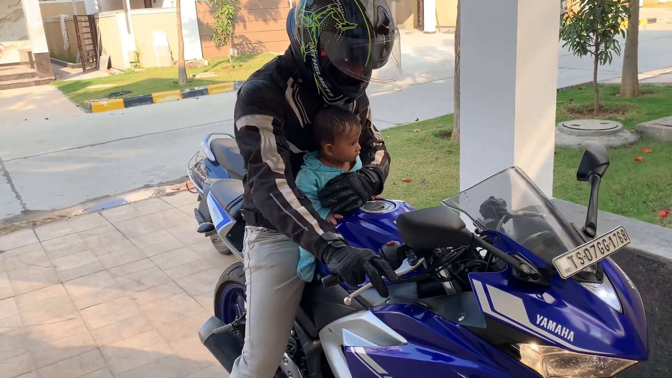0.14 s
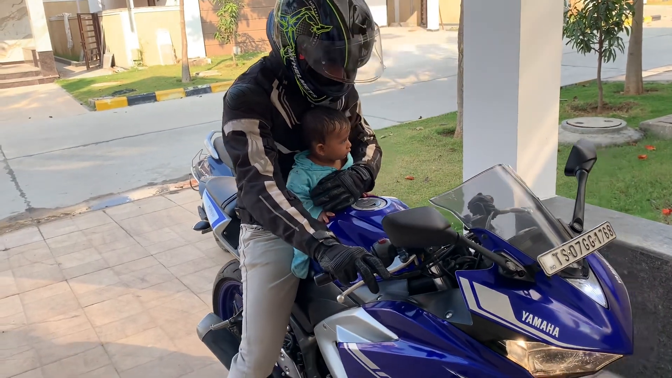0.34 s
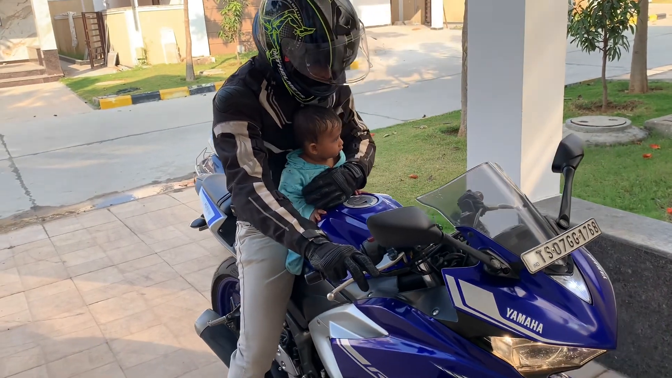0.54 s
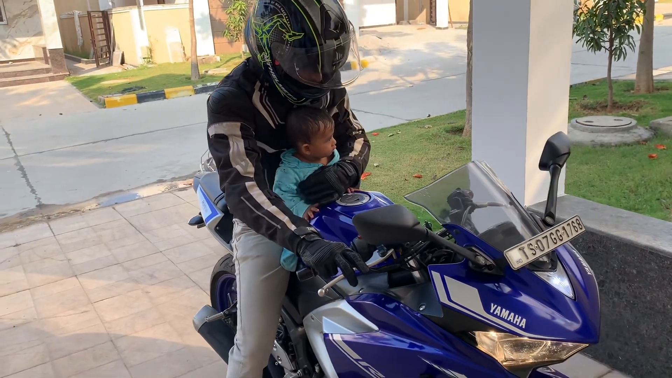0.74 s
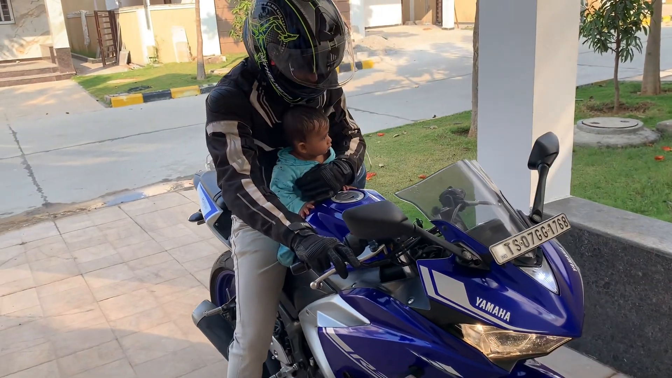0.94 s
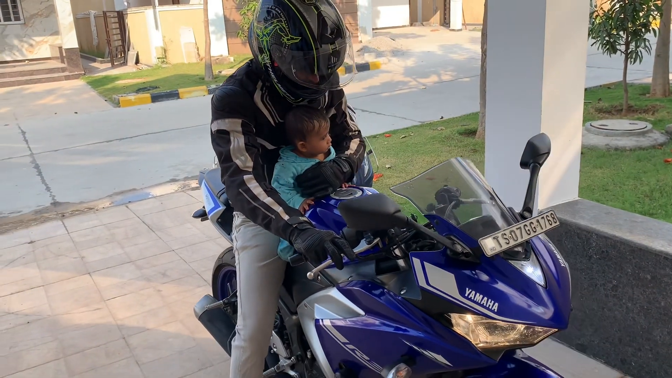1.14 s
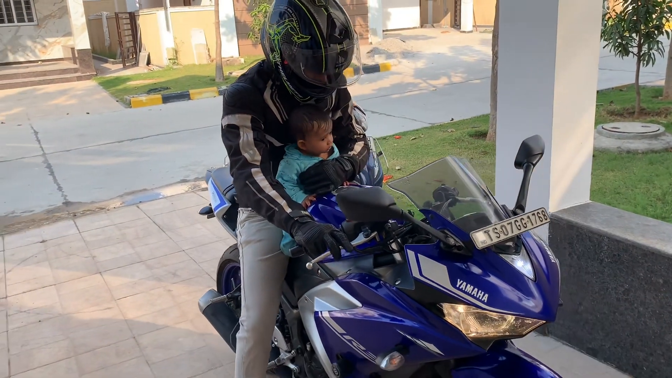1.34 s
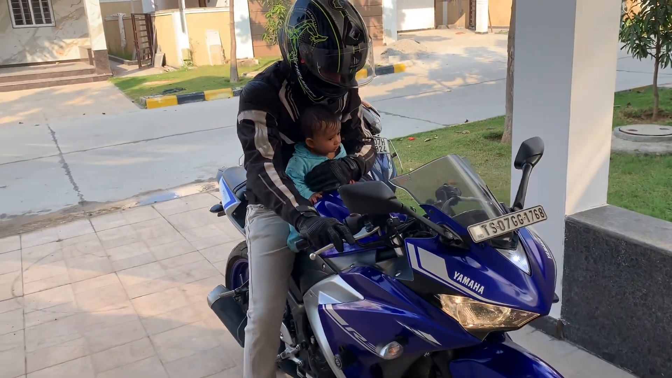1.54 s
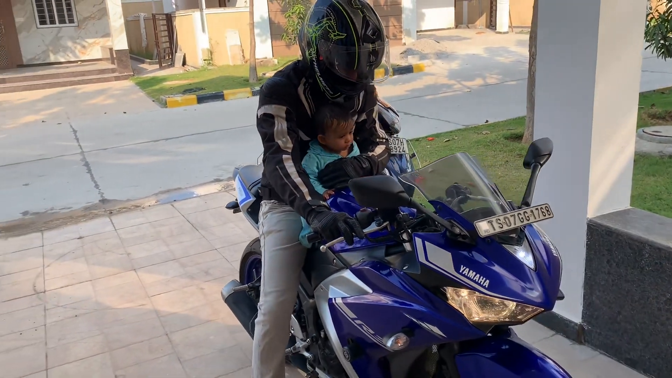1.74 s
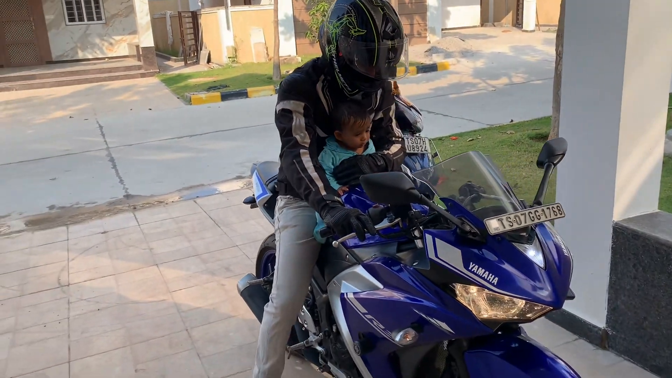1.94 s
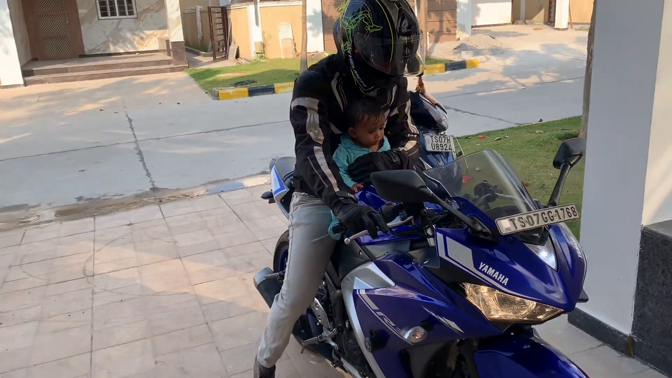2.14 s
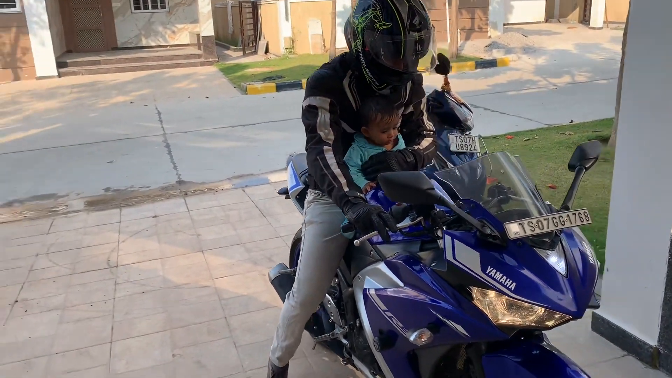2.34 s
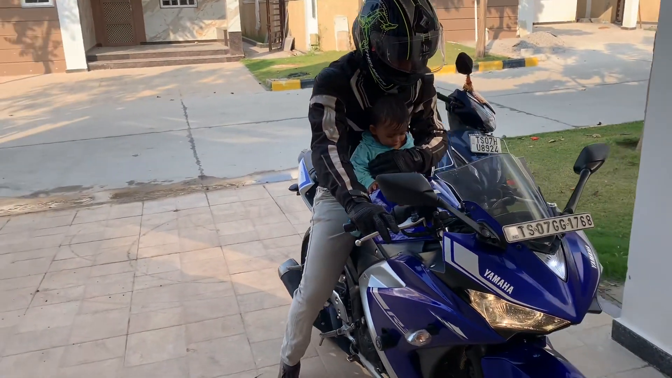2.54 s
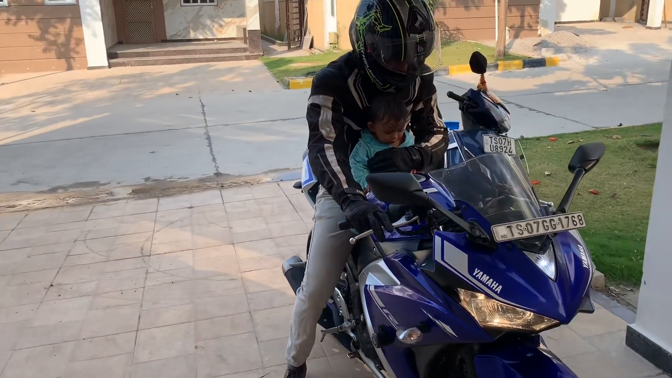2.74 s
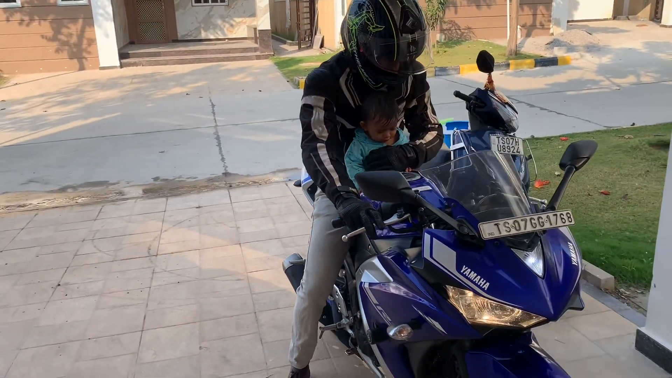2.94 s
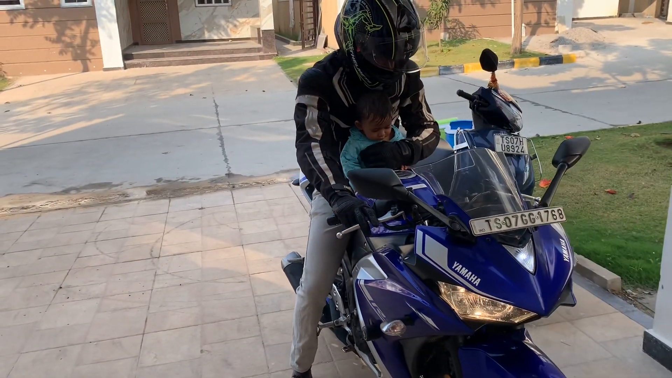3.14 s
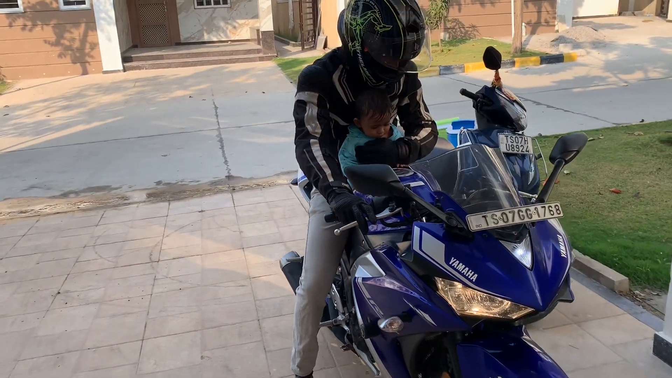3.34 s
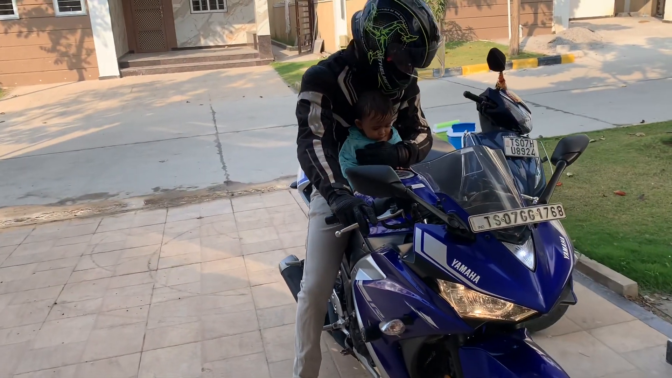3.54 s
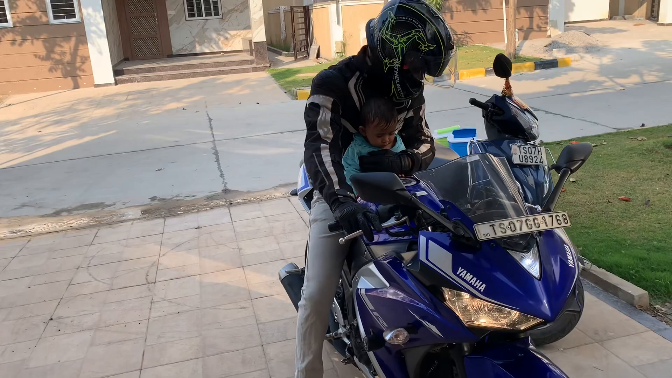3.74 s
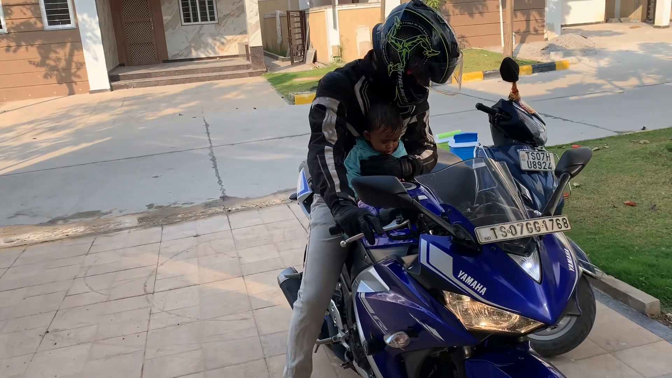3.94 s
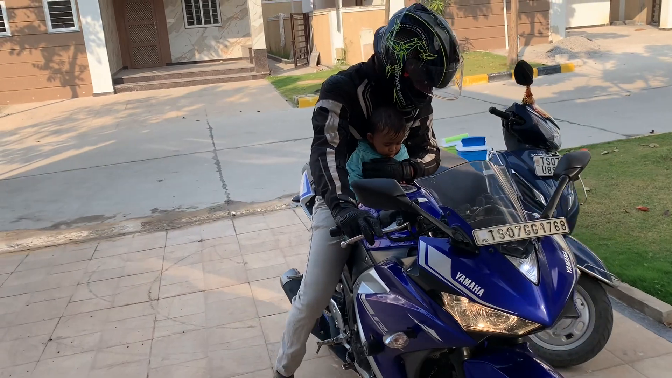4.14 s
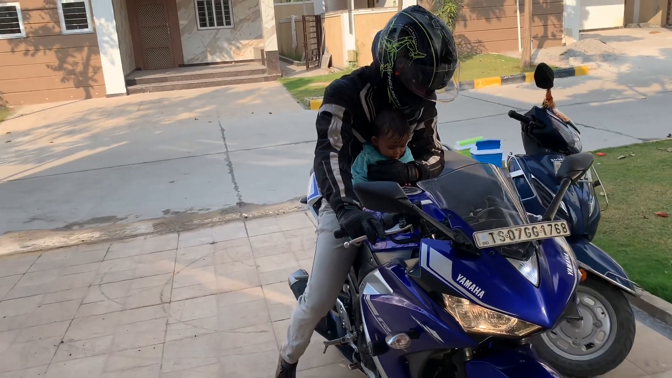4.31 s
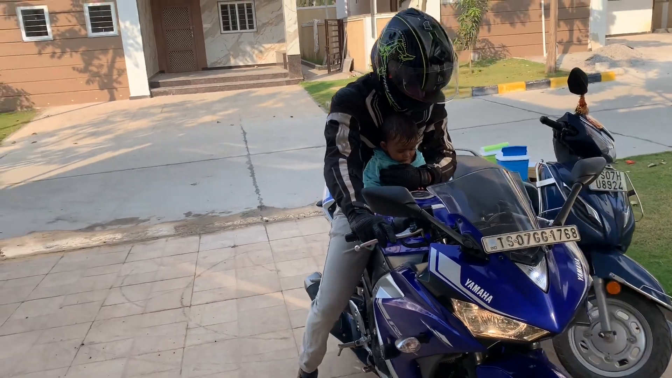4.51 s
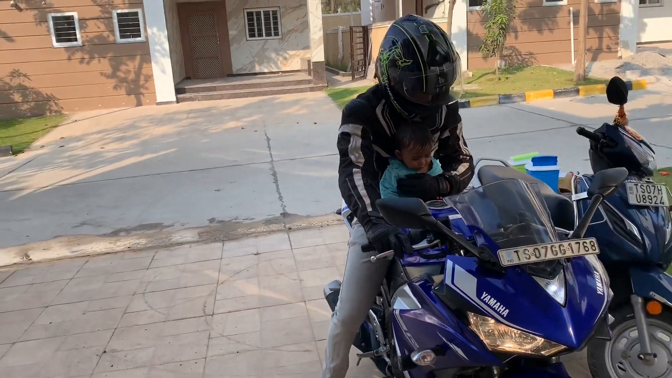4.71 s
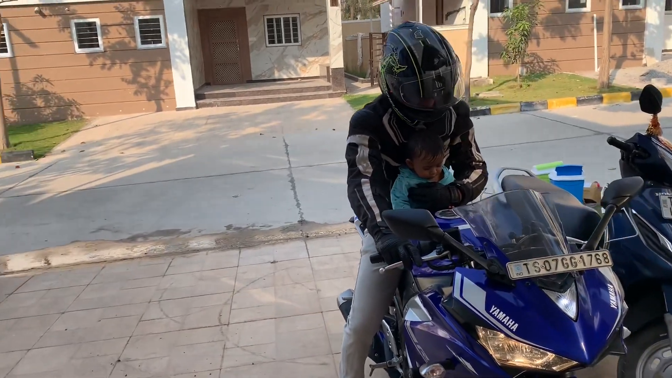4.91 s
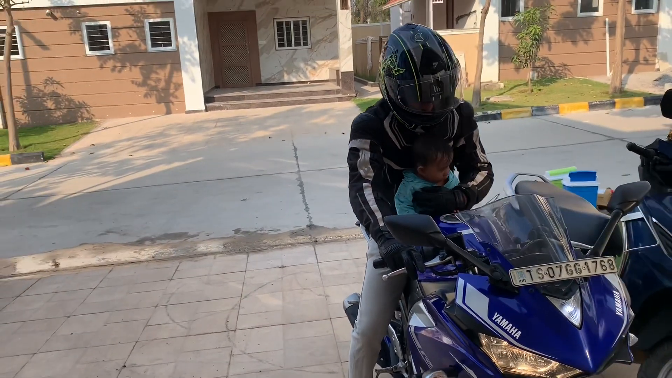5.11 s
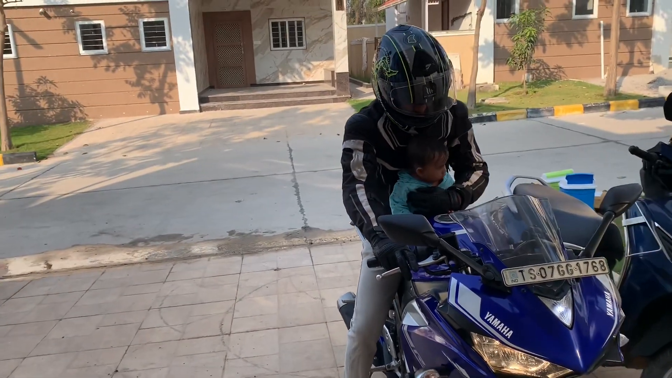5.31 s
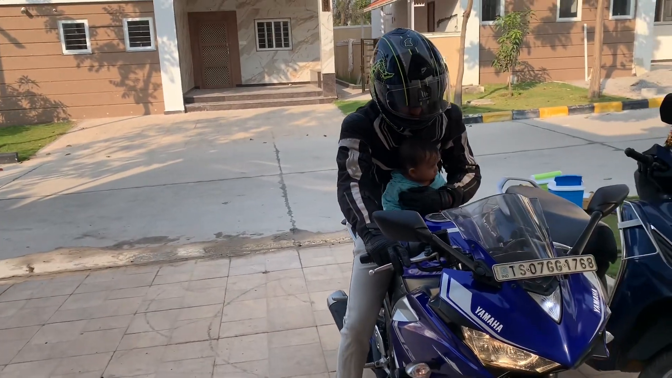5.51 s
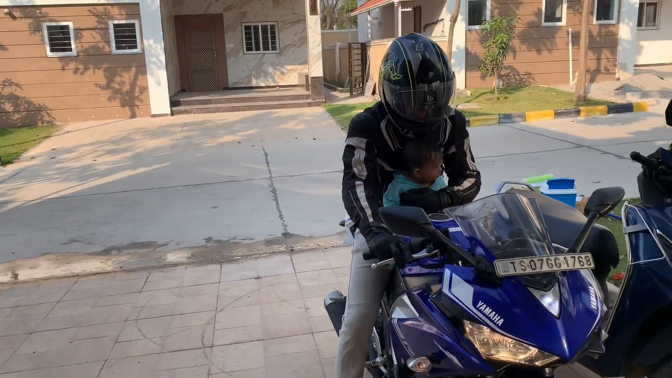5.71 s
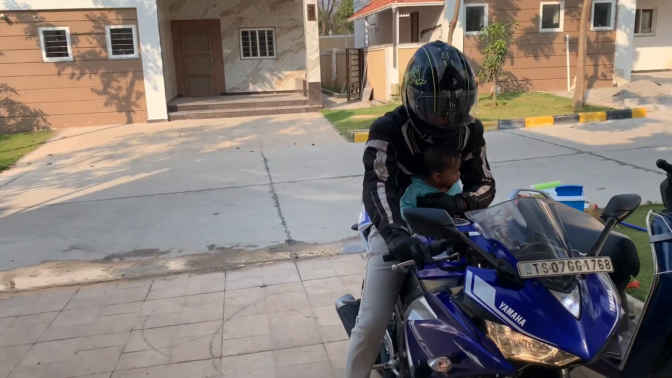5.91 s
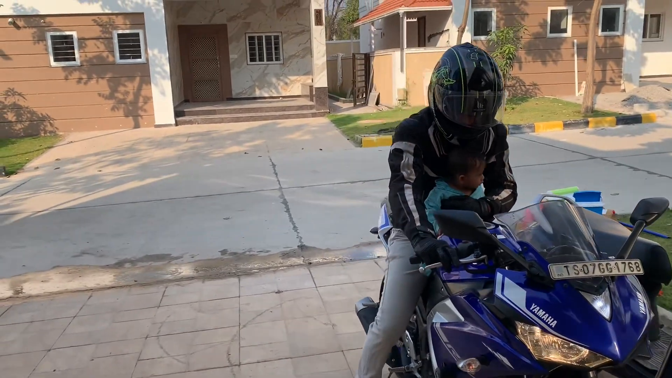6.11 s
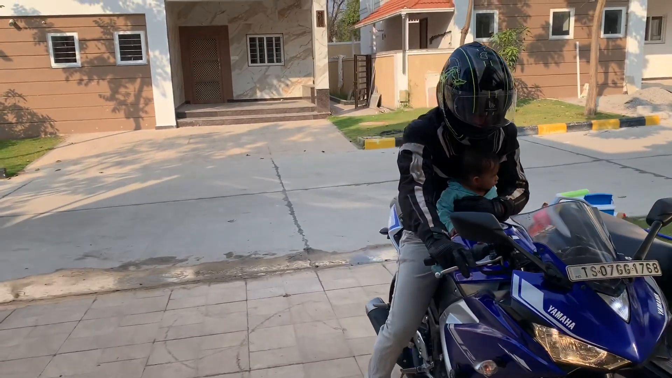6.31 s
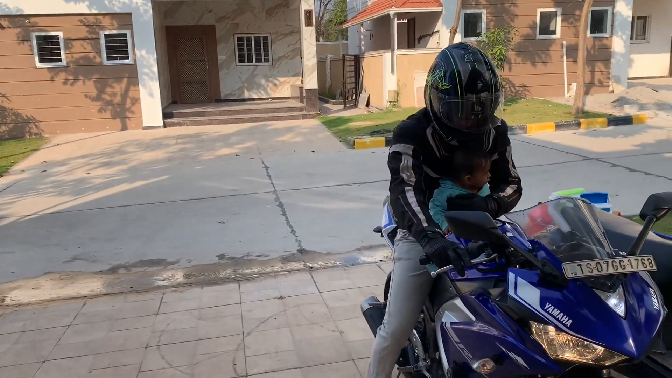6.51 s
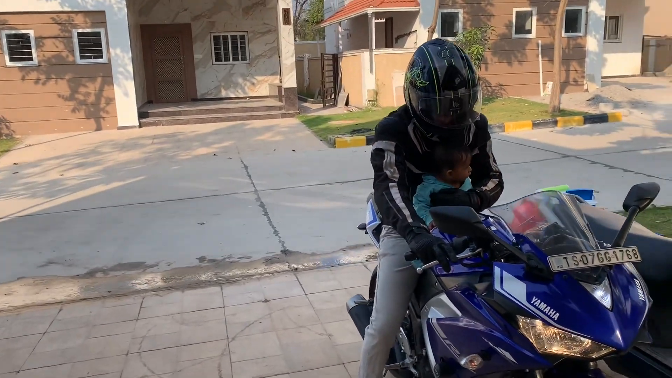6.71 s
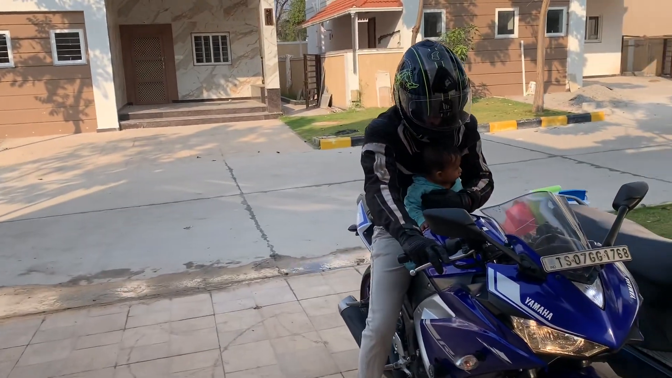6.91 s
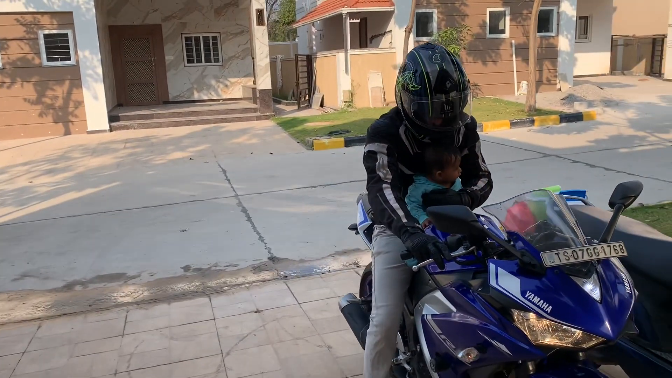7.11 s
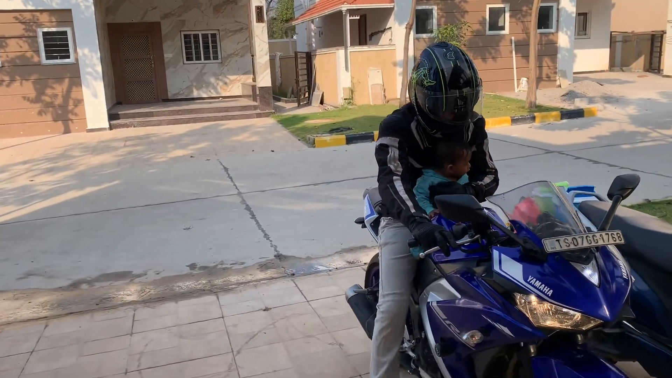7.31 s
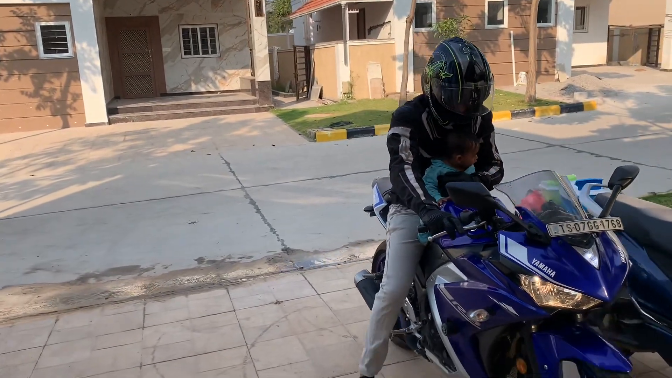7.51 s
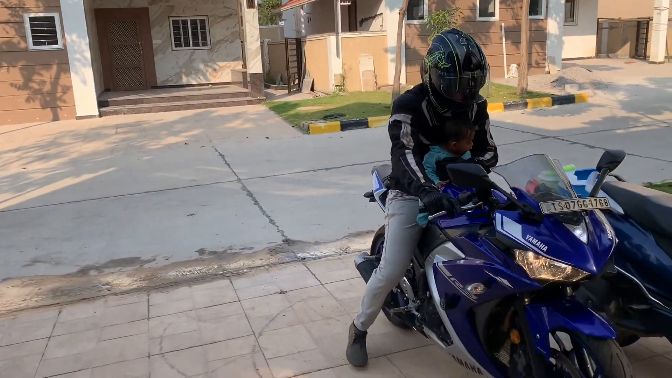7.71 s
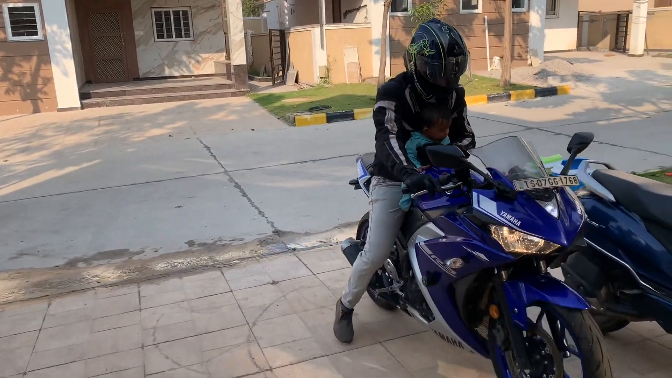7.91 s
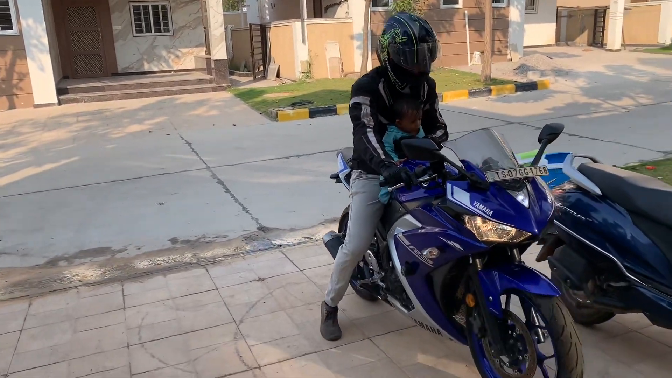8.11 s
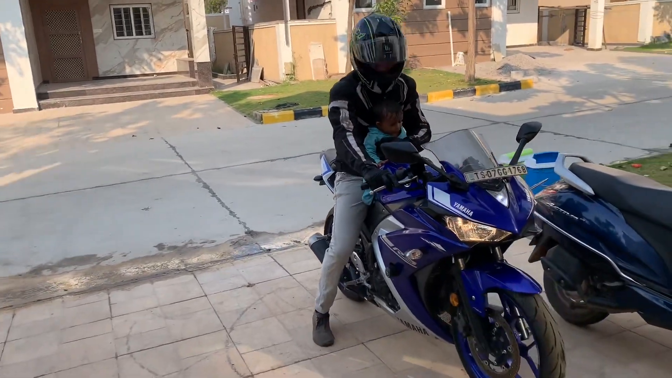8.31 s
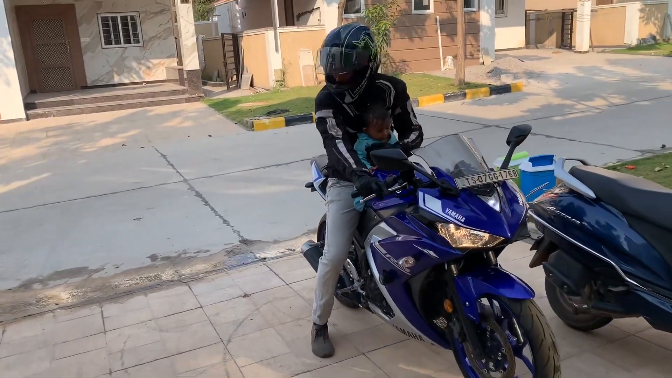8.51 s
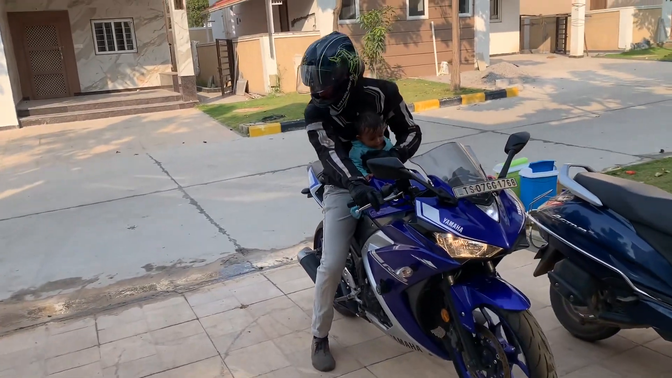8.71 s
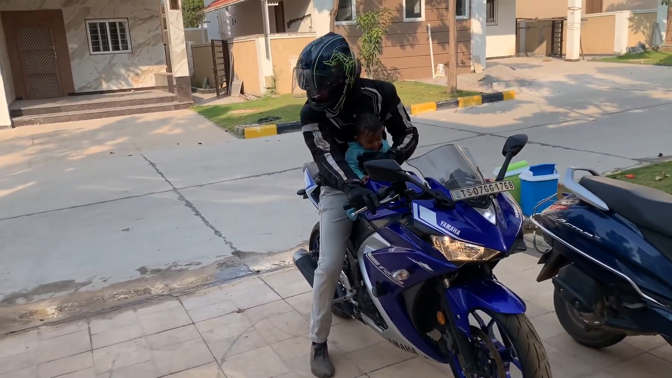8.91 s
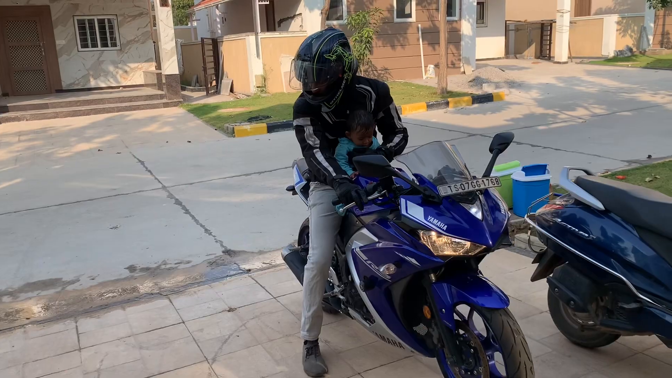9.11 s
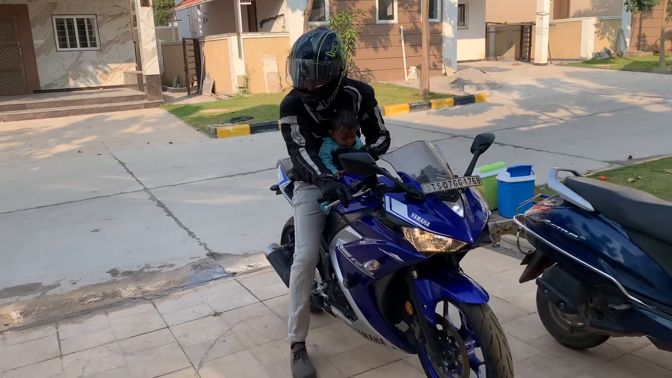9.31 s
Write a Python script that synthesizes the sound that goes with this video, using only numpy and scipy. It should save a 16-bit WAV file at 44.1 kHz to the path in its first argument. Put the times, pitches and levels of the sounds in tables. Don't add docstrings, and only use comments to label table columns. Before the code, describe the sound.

From 0 s a twin-cylinder motorcycle is already idling, with no starting sound. Rapid paired firings, about fourteen pairs a second, make a deep, slightly lumpy throb around 50 to 100 Hz, with rough pipe overtones above. Close to the nose one also hears a nasal intake honk, valve ticking, chain and gear whir, and crisp rhythmic puffs of hiss. The honk stands out near 1.4 s. Between 2.35 and 2.8 s six quick metallic tappet rattles ring out, strongest near 2.65 s. The idle climbs gently until about 5.8 s, wavering with small sags. From roughly 3.5 s the phone moves away; machinery softens, while boom and resonance swell near 5.6, 6.2 and 8.2 s. The idle eases around 6.6 s, then recovers, continuing unbroken to 9.35 s. Short porch echoes and shifting stereo treble surround it.

```python
import sys
import numpy as np
from scipy import signal
from scipy.fft import rfft, irfft
from scipy.io import wavfile
from scipy.ndimage import uniform_filter1d

SR = 44100
rng = np.random.default_rng(int(sys.argv[2]) if len(sys.argv) > 2 else 0)


def pcm_store(signal):
    levels = np.round(np.clip(np.atleast_2d(signal), -1, 1) * 32767)
    wavfile.write(sys.argv[1], SR, levels.astype(np.int16).T)


def convert_level_to_amplitude(level_db):
    exponent = np.asarray(level_db, float) / 20
    return 10 ** exponent


N = 412335
RUN_UP = 22050


def level(x, db):
    return x * convert_level_to_amplitude(db) / np.sqrt(np.mean(x ** 2))


def curves(table):
    s, *columns = np.transpose(table)
    return [np.interp(np.arange(N) / SR, s, c) for c in columns]


def noise(colour):
    hz, db = np.transpose(colour)
    axis = np.maximum(np.fft.rfftfreq(N, 1 / SR), 1)
    gain = convert_level_to_amplitude(np.interp(np.log(axis), np.log(hz), db, left=-90))
    return level(irfft(rfft(rng.standard_normal(N)) * gain, N), 0)


def wander(rate_hz):
    hold = int(SR / rate_hz)
    steps = np.repeat(rng.standard_normal(N // 500), hold)[:N]
    return 1.3 * uniform_filter1d(uniform_filter1d(steps, hold), hold)


def ring(x, hz, width_hz):
    return signal.lfilter(*signal.iirpeak(hz, hz / width_hz, fs=SR), x)


def body(x, modes):
    return sum((-1) ** k * convert_level_to_amplitude(db) * ring(x, hz, width) for k, (hz, width, db) in enumerate(modes))


def groups(x, banks, levels_db, flicker_db):
    out = 0
    for bank, db in zip(banks, levels_db):
        out = out + level(body(x, bank)[-N:], 0) * convert_level_to_amplitude(db + flicker_db * wander(5.6))
    return out


def strokes(cycle, places, scatter_db, jitter):
    out = np.zeros(len(cycle) + 1)
    turns = np.arange(-6, cycle[-1])
    for place, db in places:
        chance = rng.standard_normal((200, 2))[:len(turns)]
        at = np.interp(turns + place + jitter * chance[:, 0], cycle, np.arange(len(cycle)))
        size = convert_level_to_amplitude(db + scatter_db * chance[:, 1]) * (at < len(cycle) - 1)
        whole = at.astype(int)
        np.add.at(out, whole, size * (1 - at + whole))
        np.add.at(out, whole + 1, size * (at - whole))
    return out[:-1]


def swell(clicks, rise_s, fall_s):
    for time in (rise_s, fall_s):
        clicks = signal.lfilter([1], [1, -np.exp(-1 / (time * SR))], clicks)
    return clicks / np.mean(clicks)


# time_s, distance_0_to_1, silencer_boom_db
WALK_PATH = [(0, 0.12, -12.5), (.6, 0.08, -14.5), (.95, 0, -11.5), (1.8, 0.08, -14), (2.2, 0.03, -11.5),
             (3.3, 0.06, -13.5), (3.65, 0.2, -13.5), (3.95, 0.16, -12), (4.3, 0.23, -13.5),
             (4.85, 0.33, -14), (5.5, 0.41, -16), (6.07, .58, -16), (6.16, 0.47, -18), (6.65, 0.55, -19.5),
             (6.95, 0.53, -17), (8.1, 0.83, -17.5), (8.5, 1, -19.5), (9.35, 0.94, -18.5)]


def heard(rows):
    away, along = curves(WALK_PATH)[0], np.arange(N) / N
    return np.array([near_db + far_db * away + swing_db * np.cos(2 * np.pi * (turns * along - crest))
                     for near_db, far_db, swing_db, turns, crest in rows])


# start_s, length_s, second_porch_mode_db, pipe_ring_db, intake_honk_db
PILLAR_NOOKS = [
    (1.383, .45, 1, -0.5, 4),
    (3.78, .45, -4, 1, 1),
    (4.15, 0.29, 2, 1.5, -0.5),
    (5.55, 0.52, 5.5, -3, -1),
    (6.12, .55, -0.5, 4, 3),
    (8.2, 0.73, 3, 1.5, .1),
]


def nooks():
    t = np.arange(N) / SR
    inside = [np.clip(np.minimum(t - s, s + length - t) / 0.04, 0, 1) for s, length, *_ in PILLAR_NOOKS]
    return np.array(PILLAR_NOOKS)[:, 2:].T @ np.array(inside)


def porch(x, t60_s, wet_db, count):
    place = np.linspace(0, count - 1, N)
    time, out = np.arange(4096) / SR, np.zeros(N)
    for k in range(count):
        decay = 1000 ** (-time / t60_s)
        echoes = level(rng.standard_normal(len(time)) * decay, wet_db) / np.sqrt(len(time))
        echoes[0] = 1
        span = slice(*np.searchsorted(place, [k - 1, k + 1], "right"))
        fade = np.cos(np.pi / 2 * (place[span] - k))
        out[span] += signal.fftconvolve(x[span], echoes)[:len(x[span])] * fade
    return out / np.sqrt(1 + convert_level_to_amplitude(2 * wet_db))


# time_s, loss_cycles_per_s
LEAN_BURNS = [(0.206, 0.526), (0.579, 0.333), (1.037, 0.378), (1.554, 0.564), (1.719, 0.677), (1.879, 0.23),
              (2.044, 0.316), (2.323, 0.403), (2.652, 0.819), (3.051, 0.908), (3.366, 0.447),
              (3.621, 0.223), (3.89, 0.668), (4.054, 0.504), (4.43, 0.444), (4.759, 0.431), (4.978, 0.856),
              (5.316, 0.482), (5.493, 0.385), (5.822, 0.191), (6.2, 0.57), (6.996, 0.396), (7.389, 0.285),
              (7.791, 0.629), (8.285, 0.47), (8.577, 0.584), (8.845, 0.555), (9.092, 0.438)]


def sag():
    t = np.arange(0, N, 64) / SR
    dips = sum(loss * np.exp(-.5 * ((t - s) / 0.093) ** 2) for s, loss in LEAN_BURNS)
    return np.interp(np.arange(N) / SR, t, dips)


# time_s, four_stroke_cycles_per_s
IDLE_SPEED = [
    (0.0, 12.957),
    (1.3, 13.322),
    (2.4, 13.713),
    (3.6, 14.073),
    (4.6, 14.142),
    (5.8, 14.226),
    (6.6, 13.671),
    (8.1, 13.871),
    (9.35, 14.086),
]


def crank():
    speed = curves(IDLE_SPEED)[0] - sag()
    running = np.r_[np.full(RUN_UP, speed[0]), speed]
    return np.cumsum(running) / SR - RUN_UP * speed[0] / SR


# near_db, far_change_db, swing_db, swings_along_walk, first_crest_swings
MACHINE_LEVELS = [
    (-40.5, -5, .6, 2.8, 0.38),
    (-37.5, -4.5, 0.63, 1.03, 0.74),
    (-35.5, -8, .6, 2.5, 0.29),
]
# pitch_hz, level_db_per_hz
WHIR_COLOUR = [(18, -11), (42, 1), (130, 7.5), (300, -3.5), (600, -3), (820, -10), (1200, -5), (1600, -9.5),
               (2500, -11.5), (3500, -16), (5200, -19), (6500, -18.5), (9000, -20), (16000, -35)]


def chain_whir():
    drift = convert_level_to_amplitude(.6 * wander(4))
    draws = np.array([level(noise(WHIR_COLOUR), 7.49) for _ in range(2)])
    return draws * convert_level_to_amplitude(heard(MACHINE_LEVELS)[1]) * drift


# pitch_hz, width_hz, level_db
CASE_MODES = [
    [(971, 83, 0.5), (1120, 24, 7.5), (1253, 51, 0), (1381, 27, -5)],
    [(1827, 130, 4), (2252, 170, 3.5), (2617, 114, 4.5), (3290, 630, -4.5), (4350, 230, -7)],
]


def valve_gear(cycle):
    places = [(.55, 0.1), (.66, -1.5), (.9, -4), (.15, -7)]
    valves = swell(strokes(cycle, places, scatter_db=1.8, jitter=.02), .003, .012)
    case_db = heard(MACHINE_LEVELS)[:2]
    draws = [groups(rng.standard_normal(len(cycle)) * (0.36 + valves), CASE_MODES, case_db, 0.39)
             for _ in range(2)]
    return np.array(draws) * convert_level_to_amplitude(-2.5)


# pitch_hz, level_db_per_hz
PUFF_COLOUR = [(2000, -26), (4000, -26), (5200, 1.5), (6500, -0.5), (8500, -1), (11000, 1), (13000, -3),
               (14300, 1.5), (15300, -3.5), (16000, 4)]


def gas_puffs(cycle):
    puff_places = [(.56, 0.1), (.81, .6), (.0, -9), (.23, -10)]
    puffs = swell(strokes(cycle, puff_places, scatter_db=1.6, jitter=.012), .0025, .014)[-N:]
    tick_places = [(.6, 0.1), (.66, -3), (.86, 0.2), (.92, -2), (.28, -7)]
    ticks = swell(strokes(cycle, tick_places, scatter_db=3.2, jitter=.015), .0004, .004)[-N:]
    gain = convert_level_to_amplitude(heard(MACHINE_LEVELS)[2])
    draws = []
    for _ in range(2):
        soft = level(noise(PUFF_COLOUR) * (0.16 + puffs), 0.41)
        sharp = level(noise([(7000, -20), (11000, -3), (16000, -5.0)]) * ticks, -14)
        draws.append(porch((soft + sharp) * gain, t60_s=0.039, wet_db=8, count=30))
    return np.array(draws)


# pitch_hz, width_hz, level_db
INTAKE_MODES = [
    [(367.9, 9.6, 2.5), (426, 110, -20.5)],
    [(486, 13.3, -6), (536.3, 25, -2)],
    [(638, 32, 0.1)],
]
# near_db, far_change_db, swing_db, swings_along_walk, first_crest_swings
INTAKE_LEVELS = [
    (-36, -26, 3.5, 0.82, 0.36),
    (-31, -19, 1.5, 1.6, 0.044),
    (-50.5, -1.5, 7.6, 3.14, .01),
]


def intake_honk(cycle):
    reeds = strokes(cycle, [(.85, -3), (.07, 0.1), (.2, -2)], scatter_db=1.8, jitter=.002)
    gulps = swell(reeds, 0.0014, 0.0053)
    honk_db = heard(INTAKE_LEVELS)
    honk_db[:2] += nooks()[2]
    draws = []
    for _ in range(2):
        breath = level(rng.standard_normal(len(cycle)) * (1.5 + gulps), 0) + level(reeds, 0.95)
        draws.append(groups(breath, INTAKE_MODES, honk_db, flicker_db=1.2))
    return np.array(draws) * convert_level_to_amplitude(-3.5)


def machinery(cycle):
    metal = valve_gear(cycle) + chain_whir()
    room = np.array([porch(x, t60_s=.2, wet_db=-4, count=30) for x in metal])
    return intake_honk(cycle) + room + gas_puffs(cycle)


# pitch_hz, left_lead_half_turns
PORT_LEAD = [(0, 0), (600, .12), (1750, -.3), (3300, .45), (4500, -.1), (5300, -1), (6400, -.1),
             (7100, -.25), (8150, -1), (8800, -1), (10400, -2), (11600, -2), (12800, -3), (13750, -3),
             (15150, -4)]
# pitch_hz, likeness_0_to_1
PORT_LIKENESS = [(0, 0.21), (130, 0.76), (300, 0.99), (640, 0.52), (900, 0.41), (1150, 0.73), (1550, 0.23),
                 (2800, 0.36), (3600, 0.08), (4300, 0.49), (5000, 0.19), (5800, 0.55), (6500, 0.88),
                 (7800, 0.94)]
# pitch_hz, share_0_to_1
PORT_LOCK = [
    (6000, 1),
    (7500, 1),
    (16000, .57),
]
# pitch_hz, left_minus_right_db
PORT_TILT = [(0, -2), (1300, 0.5), (2400, -0.3), (4400, -4), (8000, -.2), (16000, 0.5)]


def ports(near, other):
    axis = np.fft.rfftfreq(N, 1 / SR)
    tables = (PORT_LEAD, PORT_LIKENESS, PORT_LOCK, PORT_TILT)
    lead, alike, locked, tilt_db = (np.interp(axis, *np.transpose(t)) for t in tables)
    share = np.sqrt((1 - np.clip(alike, 0, 1)) / 2)
    locked = np.clip(locked, 0, 1)
    scattered = rfft(other)
    common, apart = rfft(near) * np.sqrt(1 - share ** 2), scattered * share
    turn = np.exp(.5j * np.pi * lead) * convert_level_to_amplitude(tilt_db / 2)
    left, right = (common + apart) * turn, (common - apart) / turn
    loose = np.sqrt(1 - locked ** 2) * scattered * np.sin(np.pi / 2 * lead)
    side = locked * (left - right) / 2 + loose
    middle = (left + right) / 2
    return irfft(np.array([middle + side, middle - side]), N)


# time_s, peak_db
TAPPET_HITS = [
    (2.354, -34),
    (2.4374, -29),
    (2.5017, -30),
    (2.5825, -28),
    (2.6644, -27),
    (2.7432, -31),
]


def tappet():
    out, time = np.zeros(N), np.arange(2048) / SR
    age = time / 0.0072
    for s, db in TAPPET_HITS:
        burst = ring(rng.standard_normal(len(time)) * age * np.exp(-age), hz=2660, width_hz=110)
        out[int(s * SR):][:len(time)] += convert_level_to_amplitude(db - 1.5) * burst / abs(burst).max()
    return out


# pitch_hz, width_hz, level_db
PIPE_MODES = [
    [(138, 44, 2.5), (175.7, 32, 12)],
    [(211.5, 19.5, 0.1)],
    [(271.3, 9.4, 0.1)],
]
# near_db, far_change_db, swing_db, swings_along_walk, first_crest_swings
PIPE_LEVELS = [
    (-33, -4, 1.9, 1.91, 0.14),
    (-36, -1.5, 2.4, 2.39, 0.31),
    (-40, -4.5, 2.25, 1.43, 0.69),
]


def pipe_overtones(cycle):
    pipe_db = heard(PIPE_LEVELS)
    pipe_db[1] += nooks()[1]
    fire = strokes(cycle, [(.665, -0.26), (.905, -0.25)], scatter_db=-0.25, jitter=0.003)
    turbulence = rng.standard_normal(len(fire)) * (.8 + swell(fire, 0.0067, 0.049))
    return groups(level(fire, 0) + level(turbulence, -15), PIPE_MODES, pipe_db, 0.25)


# pitch_hz, width_hz, path_hz, path_width_hz, second_cylinder_db, start_lag_cycles, end_lag_cycles
LOW_MODES = [
    (101.86, 11.1, 99.64, 11.9, -6, 0.018, 0.002),
    (53.5, 4.9, 51, 16, 41, 0.037, 0.078),
    (64.6, 8, 71.3, 23, 5, -0.037, -0.12),
    (84.9, 13, 74, 13, -27, -0.012, -0.053),
]
# time_s, then extra_lag_cycles of silencer boom, first porch mode,
# second porch mode, cylinder unbalance
EXTRA_LAG = [
    (.5, .019, 0, .06, .077),
    (2.5, -.002, -.028, .032, .05),
    (4.5, -.008, -.044, -.022, .016),
    (6.5, -.01, -.016, -.01, .005),
    (8.5, -.003, .012, .035, .003),
]
# near_db, far_change_db, swing_db, swings_along_walk, first_crest_swings
PORCH_LEVELS = [
    (-31, 0.5, 2, 1.44, 0.4),
    (-28, 5.5, 0.5, 1.48, 1),
    (-36.5, -16, 15, 2.26, 0.19),
]
SAG_RESPONSE = [2.04, -8.5, -0.8, -12]


def low_boom(cycle):
    levels_db = np.array([curves(WALK_PATH)[1], *heard(PORCH_LEVELS)]) + np.outer(SAG_RESPONSE, sag())
    levels_db[2] += nooks()[0]
    state, out = rng.bit_generator.state, 0
    for mode, db, extra_lag in zip(LOW_MODES, levels_db, curves(EXTRA_LAG)):
        hz, width, path_hz, path_width, second_db, *lag = mode
        rng.bit_generator.state = state
        late = cycle - np.linspace(*lag, len(cycle)) - np.pad(extra_lag, (RUN_UP, 0), "edge")
        fire = strokes(late, [(.72, 0.1), (.97, second_db)], scatter_db=.5, jitter=.0015)
        boom = ring(ring(fire, hz, width), path_hz, path_width)[-N:]
        out = out + convert_level_to_amplitude(db) * level(boom, 0)
    return out


# time_s, left_minus_right_db, left_late_samples
EXHAUST_BEARING = [
    (0, -.8, -4),
    (1.8, -.8, -4),
    (4.5, -1.1, -.5),
    (5.3, -1.1, -.3),
    (6.6, -.3, -.3),
    (8, -.5, -2),
    (9.35, -.3, -3),
]


def exhaust(cycle):
    out = low_boom(cycle) + pipe_overtones(cycle)
    out = signal.sosfilt(signal.butter(6, 47, "high", fs=SR, output="sos"), out)
    pan_db, lag = curves(EXHAUST_BEARING)
    panned = out * convert_level_to_amplitude(np.array([pan_db, -pan_db]) / 2)
    return panned - np.gradient(out) * np.array([lag, -lag]) * 1.2


def scene():
    cycle = crank()
    return ports(*machinery(cycle)) + tappet() + exhaust(cycle)


def top_cut(x):
    return signal.sosfilt(signal.butter(12, 17060, fs=SR, output="sos"), x)


def record(dry):
    rounded = np.tanh(.7 * dry) / .7
    cut = signal.sosfilt(signal.ellip(10, .3, 80, 15800, fs=SR, output="sos"), rounded)
    return top_cut(cut)


dry = scene()
out = record(dry)
pcm_store(out)
```